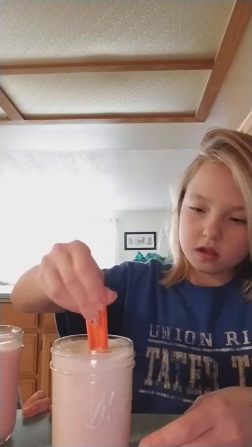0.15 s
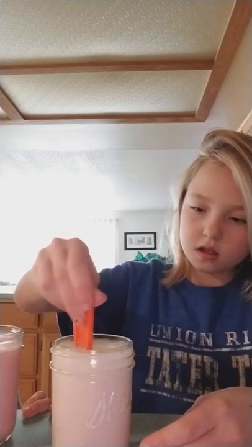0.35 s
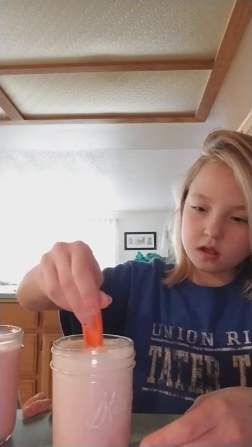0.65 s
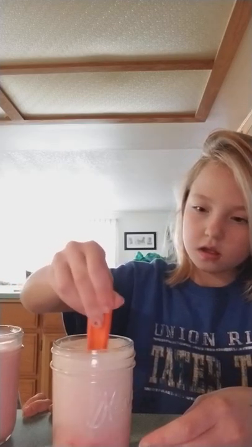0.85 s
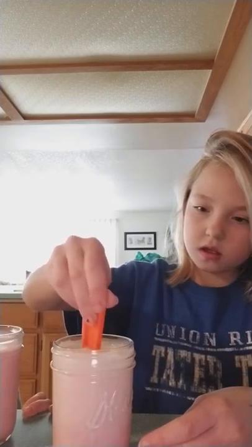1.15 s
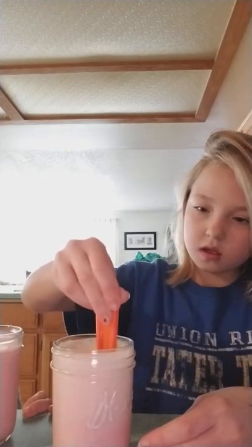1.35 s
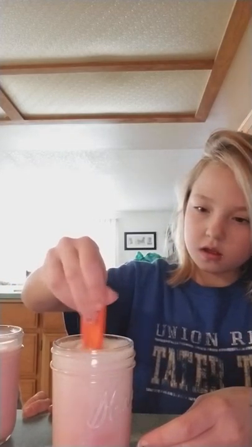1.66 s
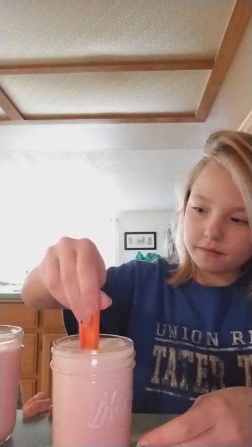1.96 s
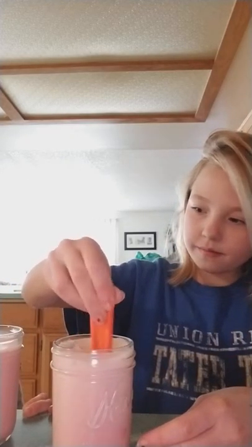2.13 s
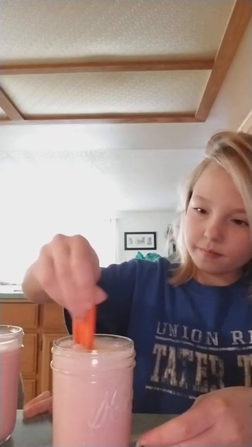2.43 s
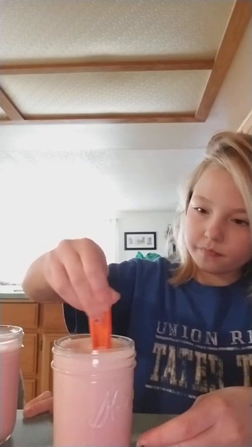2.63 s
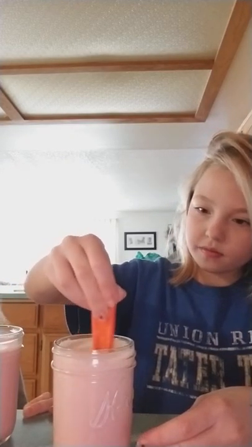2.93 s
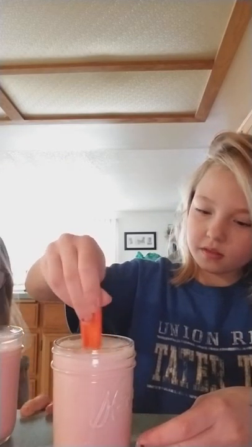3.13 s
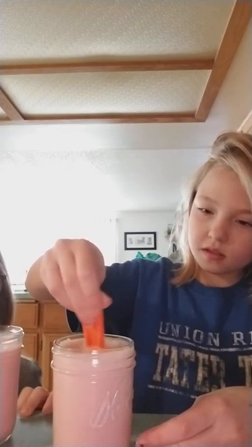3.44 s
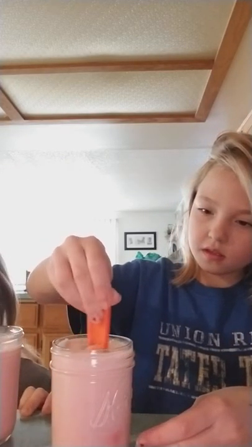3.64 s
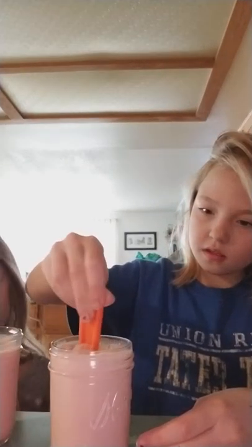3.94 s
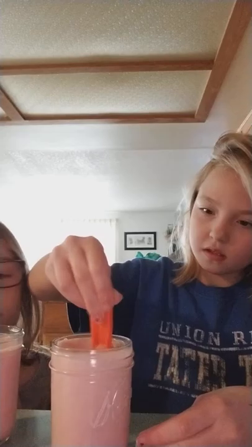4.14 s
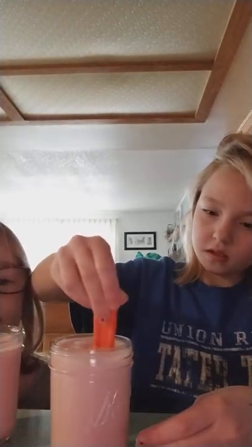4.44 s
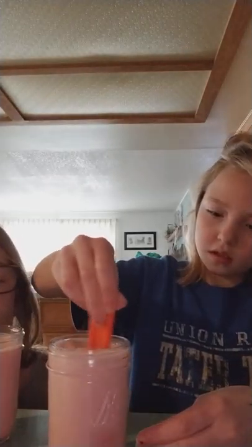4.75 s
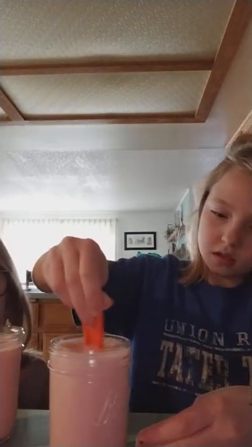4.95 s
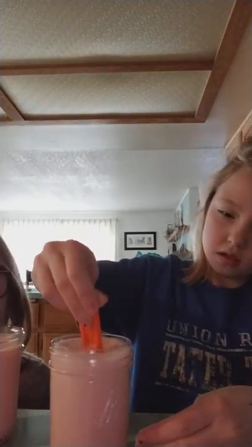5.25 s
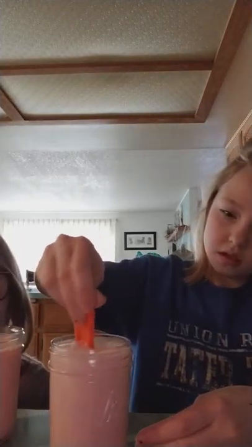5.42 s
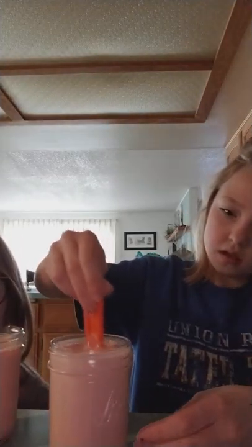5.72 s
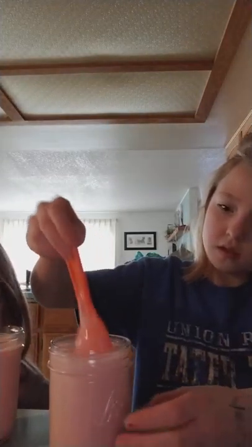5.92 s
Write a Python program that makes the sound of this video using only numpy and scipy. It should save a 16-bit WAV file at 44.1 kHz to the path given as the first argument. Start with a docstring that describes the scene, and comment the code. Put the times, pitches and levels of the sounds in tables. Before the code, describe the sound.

A plastic spoon stirs thick milk in a glass jar, ticking unevenly against the glass with soft glugs in a quiet small kitchen.

```python
"""From the start a room stirs: coloured noises rumble, shuffle and rustle like cloth, and the spoon scrapes.
At once a plastic spoon in a glass jar of thick milk starts ticking, about five times a second.
Each tick is a noise crack, a knock of struck modes and a thin ring bent by the milk; rough tones glug.
Fading noise makes a small kitchen answer; brief high tones are grazes of the glass.
From 2.7 s on, low dying tones are bumps on the table. Two unlike microphone ports hear it all."""
import sys
import numpy as np
from scipy import signal
from scipy.fft import rfft, irfft
from scipy.io import wavfile

SR = 44100
rng = np.random.default_rng(int(sys.argv[2]) if len(sys.argv) > 2 else 0)


def master(y):
    """Save y as 16-bit WAV."""
    cut = np.clip(np.atleast_2d(y).T, -1, 1)
    pcm = np.round(cut * 32767)  # scale
    wavfile.write(sys.argv[1], SR, pcm.astype(np.int16))


N = 268128  # length in samples, about 6.08 s


def from_db(db):
    """Turns decibels into a plain factor."""
    return 10 ** (np.asarray(db) / 20)


def rms_one(x):
    """Scales a sound to an average strength (rms) of 1."""
    return x / np.sqrt(np.mean(x ** 2) + 1e-20)


def in_time(rows):
    """Draws straight lines through a table whose first column is t/s; one curve per other column."""
    s, *columns = np.transpose(rows)
    return [np.interp(np.arange(N) / SR, s, c) for c in columns]


def at_hz(points, hz, column=1):
    """Reads a table at any pitch, on a logarithmic pitch scale."""
    points = np.array(points)
    return np.interp(np.log(hz + 1), np.log(points[:, 0]), points[:, column])


def band(x, low_hz, high_hz):
    """Keeps the sound between two pitches."""
    return signal.sosfilt(signal.butter(2, [low_hz, high_hz], "band", fs=SR, output="sos"), x)


def drift(per_s):
    """Slow random wandering with a spread of 1; a larger per_s wanders faster."""
    r = np.exp(-2 * np.pi * per_s / SR)
    wander = signal.lfilter([1], [1, -2 * r, r * r], rng.standard_normal(N + SR))
    return rms_one(wander[SR:])


def ring(clicks, hz, t60):
    """A resonator: a click of 1 sets a sine of height 1 ringing, 60 dB down after t60 seconds."""
    r, w = from_db(-60 / (t60 * SR)), 2 * np.pi * hz / SR
    return signal.lfilter([0, np.sin(w)], [1, -2 * r * np.cos(w), r * r], clicks + 1e-18)


def strikes(seconds, sizes):
    """A train of single-sample clicks."""
    clicks = np.zeros(N)
    clicks[np.round(np.asarray(seconds) * SR).astype(int)] = sizes
    return clicks


def blip(s, db, hz, t60, rise, swell_s):
    """One dying tone whose pitch climbs by the share 'rise' within t60, where it ends."""
    t = np.arange(min(int(t60 * SR), N - int(s * SR))) / SR
    tone = np.sin(2 * np.pi * hz * t * (1 + .5 * rise * t / t60))
    return int(s * SR), tone * from_db(db - 60 * t / t60) * (1 - np.exp(-t / swell_s))


def add_blips(rows):
    """Lays many dying tones into one signal."""
    out = np.zeros(N)
    for row in rows:
        at, tone = blip(*row)
        out[at:at + len(tone)] += tone
    return out


def struck(modes, s, level_db, spread_db, detune, longest_s):
    """Each blow is a touch and two quick bounces; each mode is detuned a little at random on every blow."""
    hz, db, t60 = np.transpose(modes)[:, :, None]
    t = np.arange(int(1.2 * longest_s * SR)) / SR
    lags = (rng.uniform(.0004, .004, (len(s), 2)) * SR).astype(int)
    luck = rng.standard_normal((len(s), 5, len(modes), 1))
    out = np.zeros(N + SR)
    for at, blow_db, lag, (strength, side, tune, *bounce) in zip(s, level_db(hz).T, lags, luck):
        fades = from_db(blow_db[:, None] + db - 60 * t / np.minimum(t60, longest_s))
        heights = np.sign(side) * from_db(spread_db * strength) * fades
        rings = heights * np.sin(2 * np.pi * hz * (1 + detune * tune) * t)
        sound = np.zeros(len(t) + max(lag))
        for delay, share in zip([0, *lag], [1, 0.71 * bounce[0], 0.2 * bounce[1]]):
            sound[delay:delay + len(t)] += (share * rings).sum(axis=0)
        # chance shares the blow's energy among the modes but does not change its total
        i = round(at * SR)
        out[i:i + len(sound)] += rms_one(sound) * np.sqrt(np.sum(fades ** 2) / len(sound))
    return out[:N]


def ports(left, right, balance):
    """The two ports share the level unevenly by pitch; the mean of their two gains stays 1."""
    ratio = from_db(at_hz(balance, np.fft.rfftfreq(N, 1 / SR)))
    share = 2 / (1 + ratio)
    return irfft([rfft(left) * ratio * share, rfft(right) * share], N)


# how alike left and right are in the room's noise: f/Hz, likeness (0 to 1)
PORT_LIKENESS = [(60, 0.98), (200, 0.92), (400, 0.94), (800, .3), (2000, 0.12), (6000, 0.01)]
# the ports' balance for the room: f/Hz, left minus right level/dB
ROOM_BALANCE = [(60, -6), (99, 4), (160, -1), (270, 3.5), (450, -13), (740, -6), (1220, -6), (2010, -8.5),
                (3330, -8.5), (5500, -14), (9080, -3), (15000, -1)]


def diffuse(spectrum):
    """Stereo noise of a given colour, alike in the bass, nearly unrelated in the treble."""
    hz = np.fft.rfftfreq(N, 1 / SR)
    mid, side = rfft(rng.standard_normal((2, N))) * from_db(at_hz(spectrum, hz))
    alike = np.clip(at_hz(PORT_LIKENESS, hz), 0, 1)
    a, b = np.sqrt(1 + alike) * mid, np.sqrt(1 - alike) * side
    return rms_one(ports(irfft(a + b, N), irfft(a - b, N), ROOM_BALANCE))


# how loud each noise of the room is, before it wavers: t/s, level/dB
RUMBLE_COURSE = [(0, -60), (.15, -70), (.46, -58.5), (.75, -70), (1.29, -65), (1.6, -68.5), (2.2, -61.5),
                 (2.45, -68.5), (2.96, -57.5), (3.2, -66), (3.57, -52.5), (3.9, -58.5), (4.5, -61),
                 (4.8, -55.5), (5.1, -65.5), (5.5, -57.5), (5.8, -65), (6.08, -70.5)]
SHUFFLE_COURSE = [(0, -53), (.12, -65), (.56, -71), (1.1, -81.5), (1.901, -75), (2.3, -67.5), (2.55, -75),
                  (2.9, -60.5), (3.25, -72), (3.358, -54), (3.5, -65), (3.71, -61.5), (3.85, -82),
                  (4.05, -61), (4.3, -81.5), (4.7, -67.5), (5.2, -72.5), (6.08, -68.5)]
RUSTLE_COURSE = [(0, -59), (.1, -69.5), (1.1, -74.5), (1.51, -71), (1.64, -74), (2.2, -72.5), (2.34, -54.5),
                 (2.57, -70), (2.73, -56), (3.12, -63), (3.27, -73), (3.35, -62), (3.55, -64),
                 (3.85, -60.5), (4.151, -66.5), (4.5, -73.5), (4.9, -63.5), (5.08, -70), (5.301, -60),
                 (5.501, -73.5), (5.85, -72.5), (6.08, -65)]


def stir_levels():
    """The levels of rumble, shuffle and rustle in dB, each with a slow random waver."""
    courses = (RUMBLE_COURSE, SHUFFLE_COURSE, RUSTLE_COURSE)
    return [in_time(course)[0] + 2.4 * drift(18.0) for course in courses]


# colour of the rumble: f/Hz, relative level/dB
RUMBLE_COLOUR = [(15, -28.5), (25, -3), (97, 9), (156, 7.5), (203, 9.5), (314, -1), (370, -2.5), (420, -5),
                 (500, -12.5), (650, -10.5), (1100, -120)]


def rumble(level_db):
    """Low coloured noise that swells and sinks."""
    return from_db(level_db) * diffuse(RUMBLE_COLOUR)


# colour of the shuffle: f/Hz, relative level/dB
SHUFFLE_COLOUR = [(210, -54), (350, -26.5), (604, -5.5), (926, -6), (1100, -5), (1350, -15.5), (1700, -8),
                  (1930, -9.5), (4500, -15.5), (5850, -42.5), (9900, -120)]


def shuffle(level_db):
    """Middle-pitched coloured noise that comes and goes."""
    return from_db(level_db) * diffuse(SHUFFLE_COLOUR)


# colour of the cloth: f/Hz, relative level/dB
RUSTLE_COLOUR = [(2350, -67), (4000, -6), (4100, -9), (4560, -7.5), (5070, 0), (5700, 4), (5840, 8.5),
                 (6230, 5), (7180, -13), (8370, -5.5), (9650, 2.5), (13500, -9), (15100, -1.5),
                 (15700, -1.5), (15900, -37.5)]


def cloth_rustle(level_db):
    """Cloth heard as high coloured noise that comes and goes."""
    return from_db(level_db) * diffuse(RUSTLE_COLOUR)


# body modes of jar and spoon: f/Hz, relative level/dB, t60/s (the scrape uses its own, the knock caps it)
BODY_MODES = [(1300, -20.5, 0.09), (1793, -17.5, 0.09), (2085, -48.5, 0.09), (2290, 8.5, 0.0047),
              (2490, 1.5, 0.09), (2752, 0, 0.029), (3024, 6.5, 0.0059), (3010, 3, 0.016), (3270, 0, 0.054),
              (3570, -8.5, 0.057), (3740, 1, 0.018), (3986, 0, 0.042)]


def scrape(level_db):
    """The spoon drags along the glass: sparse uneven grains set the body modes ringing."""
    grains_per_s, t60_s = 200, .015
    out = np.zeros(N)
    for hz, db, _ in BODY_MODES:
        present = rng.random(N) < grains_per_s / len(BODY_MODES) / SR
        sizes = from_db(3.5 * np.minimum(rng.exponential(1, N), 3))
        out += ring(from_db(db) * present * sizes, hz, t60_s)
    return from_db(level_db) * rms_one(band(out, 700, 4500))


# hollow modes of the jar: f/Hz, relative level/dB, t60/s
HOLLOW_MODES = [(190, -7, 0.06), (337, -11.5, 0.082), (418.3, 2, 0.088), (557, -13, 0.048)]


def swirl_hum(rumble_db):
    """Swirling milk keeps one hollow mode humming: noise feeds its resonator, 12 dB under the rumble."""
    hz, _, t60 = HOLLOW_MODES[2]
    return from_db(rumble_db - 12) * rms_one(ring(rng.standard_normal(N), hz, t60))


# spoon on glass: t/s, bright level/dB, body level/dB, body f/Hz, ring level/dB
TICK_BLOWS = [(.001, -47, -42, 2270, -37), (0.0257, -50, -47, 3500, -73.5),
              (0.118, -47, -35.5, 1870, -34.5), (0.222, -17, -24, 3500, -39.5),
              (0.411, -28.5, -32, 2230, -37.5), (0.4561, -40, -32, 2350, -38.5),
              (0.6014, -18.5, -27, 2770, -37.5), (0.8435, -60, -64.5, 3000, -57.5),
              (0.9013, -63.5, -57.5, 3050, -54), (0.9692, -57, -63, 3010, -60),
              (1.016, -20.5, -22, 2490, -44.5), (1.2178, -40.5, -40.5, 2490, -46.5),
              (1.276, -43, -39.5, 3260, -50), (1.451, -22, -32, 3010, -39.5),
              (1.6507, -38, -45, 3260, -41.5), (1.693, -45.5, -40, 2170, -51),
              (1.723, -50.5, -50, 2740, -82.5), (1.8509, -24.5, -27, 2590, -37.5),
              (2.0587, -32, -43, 3200, -45), (2.0948, -35.5, -38.5, 2290, -53),
              (2.2785, -19, -23.5, 3010, -30), (2.4987, -25.5, -38.5, 2920, -33),
              (2.5308, -38.5, -30.5, 2880, -71), (2.5553, -44, -39.5, 2760, -64),
              (2.606, -61.5, -49.5, 3010, -75), (2.6764, -18.5, -23, 2680, -45.5),
              (2.8639, -32.5, -36, 2500, -34.5), (2.8925, -34, -41, 3740, -82.5),
              (3.0591, -18.5, -22.5, 2490, -34), (3.272, -43, -41, 2560, -46.5),
              (3.2955, -53, -51, 3150, -85.5), (3.4261, -21.5, -21.5, 2780, -41.5),
              (3.5995, -30.5, -33.5, 3930, -35.5), (3.6362, -44, -40.5, 2440, -61.5),
              (3.8055, -18, -27.5, 2840, -42), (4.0137, -38.5, -39.5, 3140, -41),
              (4.139, -52.5, -45.5, 3010, -66.5), (4.1892, -18.5, -19, 3580, -46),
              (4.3888, -35, -40.5, 3570, -53), (4.4156, -48, -49, 3270, -44.5),
              (4.5511, -21.5, -20, 2230, -29), (4.7389, -31, -20, 1890, -31),
              (4.773, -33.5, -34.5, 3280, -34.5), (4.9131, -17, -22, 2490, -26.5),
              (5.1062, -49, -42.5, 2840, -48.5), (5.3023, -17, -25.5, 2880, -39),
              (5.4959, -29.5, -40, 2840, -40), (5.5434, -41, -35, 3040, -52),
              (5.565, -42.5, -45.5, 3130, -71), (5.7015, -51.5, -52, 2810, -60.5),
              (5.8067, -54.5, -60, 2430, -70)]
# bright modes of jar and spoon: f/Hz, relative level/dB, t60/s (capped in the knock)
BRIGHT_MODES = [(5135, -3, 0.045), (4924, -8.5, 0.082), (5172, 1.5, 0.075), (5440, -3, 0.0024),
                (5660, -2, 0.053), (6122, -6, 0.12), (6110, -3, 0.039), (7330, -28.5, 0.045),
                (9775, -18, 0.03), (9360, -8.5, 0.045), (9440, -36, 0.004), (11890, -16, 0.033),
                (11250, -15.5, 0.009), (13100, -17, .008), (14500, -32.5, 0.03)]


def knock():
    """The short clack of a blow: bright modes, and body modes favoured when near the blow's own pitch."""
    s, bright, body, body_hz, _ = np.transpose(TICK_BLOWS)
    focus_db_per_octave, longest_t60_s = 20.5, .024

    def near(hz):
        return body - focus_db_per_octave * np.abs(np.log2(hz / body_hz))

    high = struck(BRIGHT_MODES, s, lambda hz: bright + 0 * hz, 2.8, .012, longest_t60_s)
    low = struck(BODY_MODES, s, near, 3, .03, longest_t60_s)
    return band(high, 3500, 16000) + band(band(low, 1600, 4800), 1500, 6000)


def crack():
    """The plastic edge snaps: a broad burst of noise that dies in milliseconds."""
    s, bright, *_ = np.transpose(TICK_BLOWS)
    fade_s = 0.00087
    snaps = strikes(s, from_db(bright - 7.5))
    shape = signal.lfilter([1], [1, -np.exp(-1 / (fade_s * SR))], snaps + 1e-18)
    return band(band(shape * rng.standard_normal(N), 1600, 14000), 1600, 14000)


# the free ring, until the returning milk mutes it: t/s, t60/s (held to 0.06-0.6), lasts/s
FREE_RING = [(0, .2, .07), (.13, 0.066, 0.045), (.6, 0.21, 0.13), (1.05, 0.64, 0.093), (1.25, 0.11, .06),
             (1.47, 0.38, 0.41), (1.7, 0.2, .1), (2.25, 0.074, 0.15), (2.7, 0.27, 0.16), (2.88, 0.13, 0.08),
             (3.1, .25, 0.22), (3.8, 0.13, .07), (4.3, 0.24, 0.063), (4.6, 0.037, 0.13), (6.08, 0.1, 0.065)]


def wall_ring():
    """One wall mode rings on: each blow pushes it flat, and it climbs back as the milk settles."""
    top_hz, sag_hz, settle_s, waver_hz, muted_t60_s = 2001.7, 48.4, 0.088, 8, 0.06
    s, *_, level_db = np.transpose(TICK_BLOWS)
    t, (t60, lasts) = np.arange(N) / SR, in_time(FREE_RING)
    since = t - s[np.maximum(np.searchsorted(s, t) - 1, 0)]  # time since the last blow
    hz = top_hz - sag_hz * np.exp(-np.abs(since) / settle_s) + waver_hz * drift(17.0)
    t60 = np.where(since > lasts, muted_t60_s, np.clip(t60, .06, .6))
    # a turning, shrinking arrow; dividing each click by it starts that click's ring afresh
    motion = np.exp(np.cumsum(2j * np.pi * hz - np.log(1000) / t60) / SR)
    rings = (motion * np.cumsum(strikes(s, from_db(level_db)) / motion)).imag
    return band(rings, 1880, 2050) * from_db(2.5 * drift(30.))


# low hollow knock of the jar and rough glug at each blow: t/s, glug level/dB, glug f/Hz, hollow level/dB
LOW_BLOWS = [(.001, -30.5, 720, -42), (0.028, -36.5, 734, -41.5), (0.117, -38, 570, -43.5),
             (0.223, -38, 757, -32.5), (0.41, -46.5, 914, -57), (0.455, -44.5, 567, -43),
             (0.602, -28.5, 1507, -44), (0.843, -70, 1200, -57), (0.902, -53, 1240, -54),
             (1.017, -60, 784, -46), (1.219, -35.5, 1000, -53.5), (1.277, -38.5, 1190, -46.5),
             (1.452, -48, 1430, -47.5), (1.653, -42, 1100, -44.5), (1.693, -31.5, 850, -44),
             (1.852, -37.5, 1300, -36), (2.06, -29, 832, -50.5), (2.096, -31, 874, -41.5),
             (2.277, -37.5, 1360, -42), (2.501, -37.5, 1237, -41), (2.53, -31.5, 868, -43.5),
             (2.603, -46, 1120, -49), (2.63, -42, 574, -55), (2.674, -34.5, 1235, -49),
             (2.838, -47.5, 1100, -57), (2.865, -33, 1095, -52.5), (2.893, -36.5, 1120, -39.5),
             (3.04, -48.5, 1300, -52), (3.059, -67, 1230, -52), (3.275, -44, 1150, -48),
             (3.296, -41.5, 860, -50.5), (3.425, -31.5, 1235, -48), (3.525, -42, 550, -59.5),
             (3.599, -37.5, 1090, -43.5), (3.634, -33, 1053, -45), (3.697, -52, 1120, -66),
             (3.805, -27.5, 1356, -73), (4.013, -40, 1116, -48), (4.033, -45.5, 1210, -65),
             (4.138, -48, 1350, -50.5), (4.191, -43, 1480, -49), (4.39, -35.5, 1170, -34.5),
             (4.416, -36, 1200, -47), (4.551, -34, 1353, -47.5), (4.738, -30, 1120, -45),
             (4.775, -35, 910, -43), (4.914, -27.5, 915, -48.5), (5.109, -48, 1140, -48),
             (5.303, -30.5, 1290, -52.5), (5.495, -30.5, 911, -46), (5.557, -38.5, 1200, -46.5),
             (5.703, -46.5, 1157, -62.5)]


def hollow_knock():
    """The low hollow knock of the jar at each blow: its low modes are struck."""
    s, *_, level_db = np.transpose(LOW_BLOWS)
    return band(struck(HOLLOW_MODES, s, lambda hz: level_db + 0 * hz, 3, .012, .16), 200, 1100)


def glugs():
    """Short rough glugs of three close pitches; high ones ring longer, low ones climb most in pitch."""
    rows = []
    pitches = 1 + .1 * rng.standard_normal((len(LOW_BLOWS), 3)) * [0, 1, 1]
    for (s, db, glug_hz, _), shares in zip(LOW_BLOWS, pitches):
        for share, side_db in zip(shares, (3., -3., -5.)):
            t60 = .036 * (glug_hz / 1100) ** 0.93
            rise = min(.1 * (glug_hz / 1100) ** -1.7, .3)
            rows.append((s, db + side_db, glug_hz * share, t60, rise, .004))
    return add_blips(rows)


# how the kitchen answers: f/Hz, t60/s, relative level/dB
KITCHEN_ECHO = [(212, 0.3, 6.5), (583, 0.15, 4.5), (1200, 0.22, -7), (2500, 0.21, -10.5), (5450, 0.2, -16),
                (10550, 0.073, -8)]


def kitchen(x):
    """Dense echoes after a short gap: half-octave noise bands, each dying at its own rate, new per port."""
    gap_s = 0.0027
    t = np.arange(SR // 2) / SR
    answer = 0
    for hz in 125 * 2 ** np.arange(0, 7, .5):
        noise = band(rng.standard_normal((2, len(t))), hz, hz * np.sqrt(2))
        t60 = at_hz(KITCHEN_ECHO, hz)
        fade = from_db(at_hz(KITCHEN_ECHO, hz, column=2) - 60 * t / t60)
        fade = fade * np.sqrt(2 * np.log(1000) / (t60 * SR))  # long tails get no extra energy
        answer = answer + noise * fade * np.clip(t / gap_s - 1, 0, 1)
    return signal.fftconvolve(answer, x[None])[:, :N]


# spoon grazing the wall: t/s, level/dB
WALL_GRAZES = [(0.0707, -33), (1.3735, -52.5), (2.63, -45), (3.0097, -42.5), (3.3657, -35.5), (3.6594, -40),
               (3.696, -39), (4.038, -47.5), (4.501, -53), (4.8633, -43), (5.237, -41.5), (5.4814, -38)]


def grazes():
    """Brief ticks where the spoon grazes the glass: 14 ms tones at 2950 Hz that climb by 6 percent."""
    return add_blips([(s, db, 2950, .014, .06, .001) for s, db in WALL_GRAZES])


# bumps on the table: t/s, level/dB, f/Hz, t60/s
TABLE_BUMPS = [(2.688, -37, 190, 0.1), (2.95, -45, 38.7, 0.32), (3.551, -44, 98.7, 0.36),
               (3.816, -33, 41, 0.36), (4.941, -35.5, 190, 0.16)]


def bumps():
    """Soft pushes on the table top boom briefly: low dying tones of steady pitch."""
    return add_blips([(s, db, hz, t60, 0, 0.0048) for s, db, hz, t60 in TABLE_BUMPS])


# the ports' balance for the jar: f/Hz, left minus right level/dB
JAR_BALANCE = [(60, -6), (99, -1.5), (160, 4.5), (270, -8.5), (450, -9), (740, -8), (1220, -9),
               (2010, -14.5), (3330, -5.5), (5500, -16.5), (9080, 0), (15000, 10.5)]


def scene():
    """Jar, its echoes, the table and the stir of the room, added up at the two ports."""
    rumble_db, shuffle_db, rustle_db = stir_levels()
    stir = rumble(rumble_db) + shuffle(shuffle_db) + cloth_rustle(rustle_db)
    clack = scrape(shuffle_db - 14.0) + knock() + crack() + glugs() + grazes()
    rings = swirl_hum(rumble_db) + wall_ring() + hollow_knock()
    ticks = clack + rings
    # the left port hears the ticks smeared over seven samples
    smeared = signal.lfilter([0.34, -0.4, 0.69, 0.18, 0.39, 0.16, -0.00047], [1], ticks)
    flutter = from_db(3 * np.array([drift(60.), drift(60.)]))  # the echoes flutter a little
    echoes = kitchen(clack + .4 * rings) * flutter
    return ports(smeared + echoes[0], ticks + echoes[1], JAR_BALANCE) + stir + bumps()


def top_cut(x):
    """Nothing passes above the cut-off."""
    return signal.sosfilt(signal.butter(12, 16570, fs=SR, output="sos"), x)


def record(dry):
    """The microphones add a steady treble hiss, and the top above about 17 kHz is cut."""
    hiss = from_db(-85) * band(rng.standard_normal(dry.shape), 13000, 15500)
    cut = signal.cheby2(10, 50, 17000, fs=SR, output="sos")
    mix = signal.sosfilt(cut, dry + hiss)
    return top_cut(mix)


dry = scene()
out = record(dry)
master(out)
```